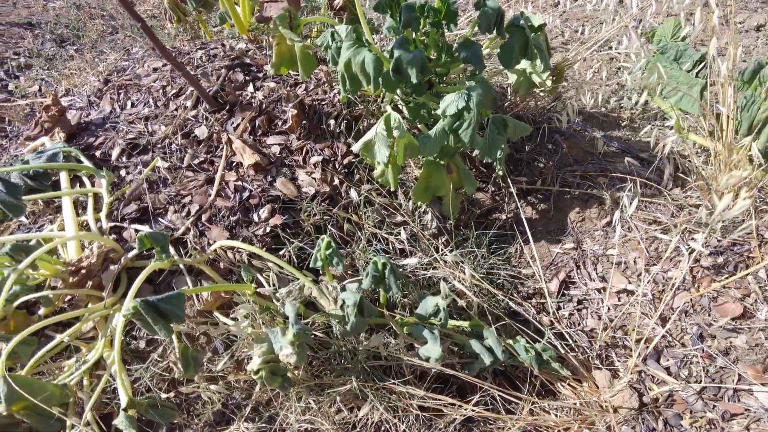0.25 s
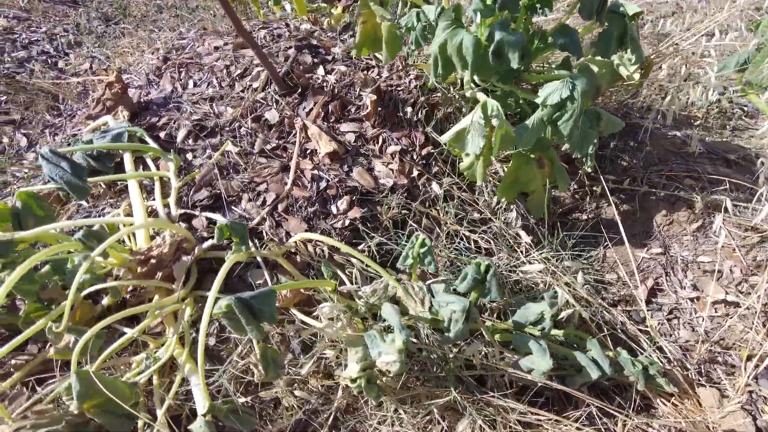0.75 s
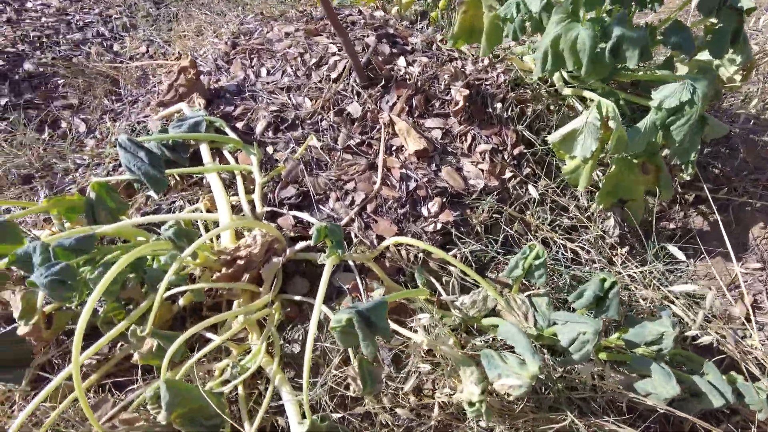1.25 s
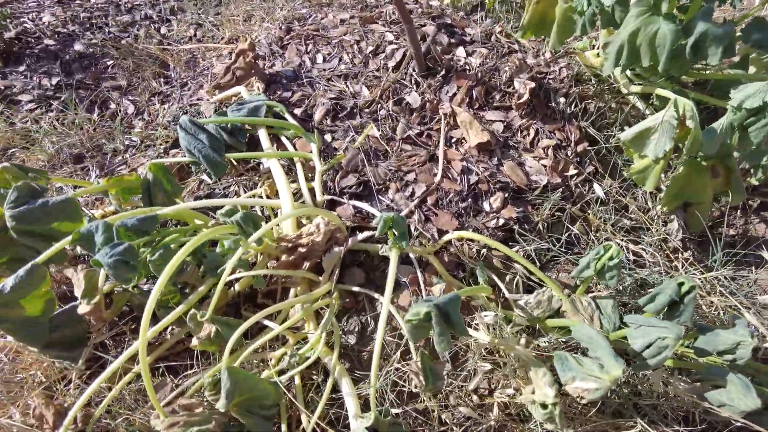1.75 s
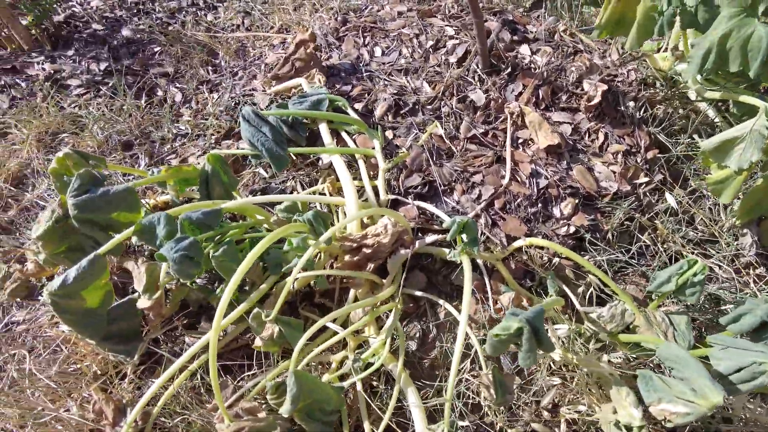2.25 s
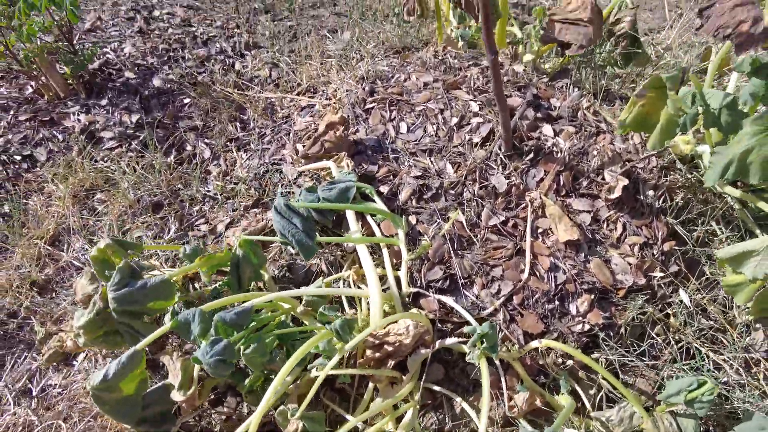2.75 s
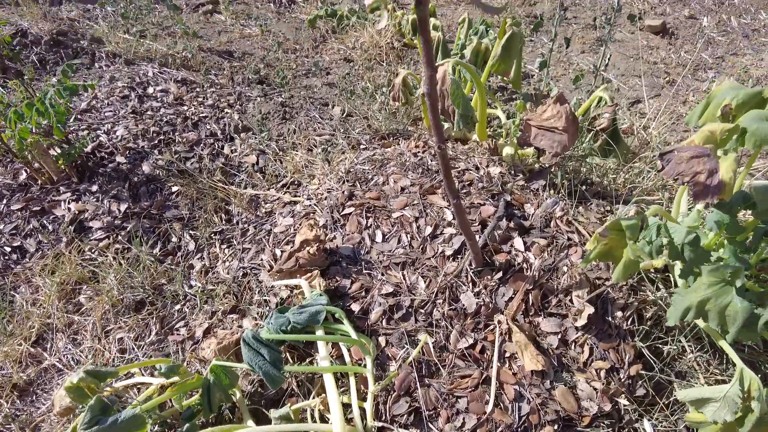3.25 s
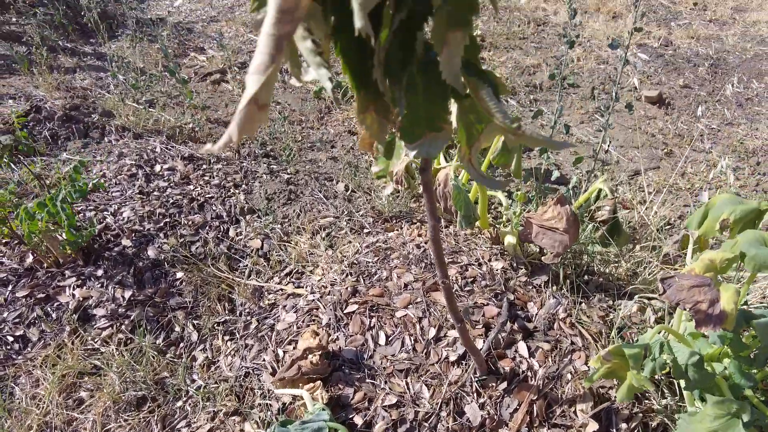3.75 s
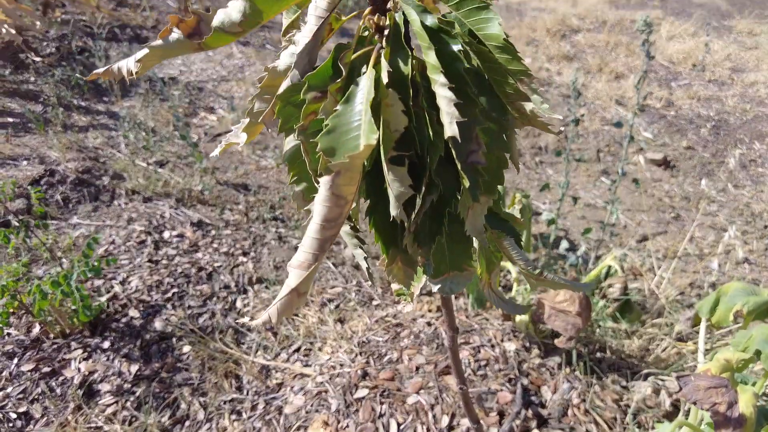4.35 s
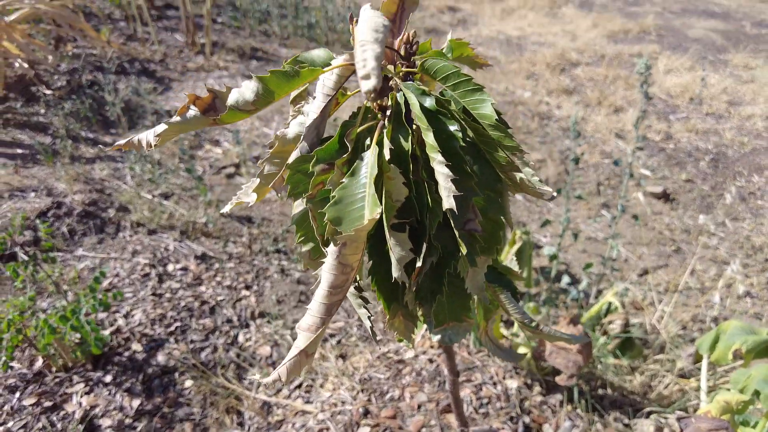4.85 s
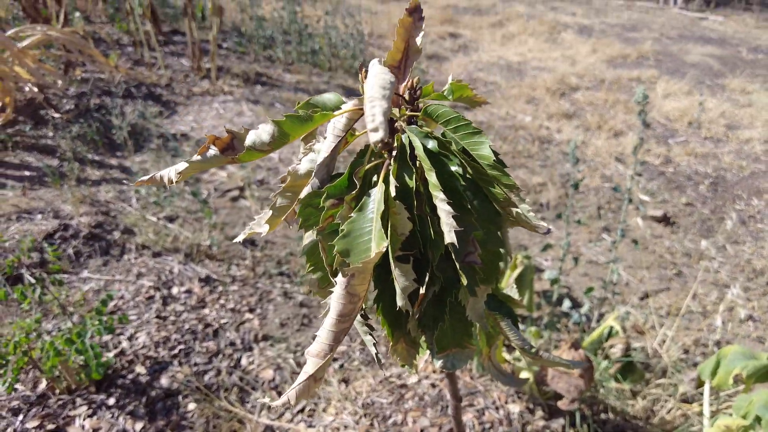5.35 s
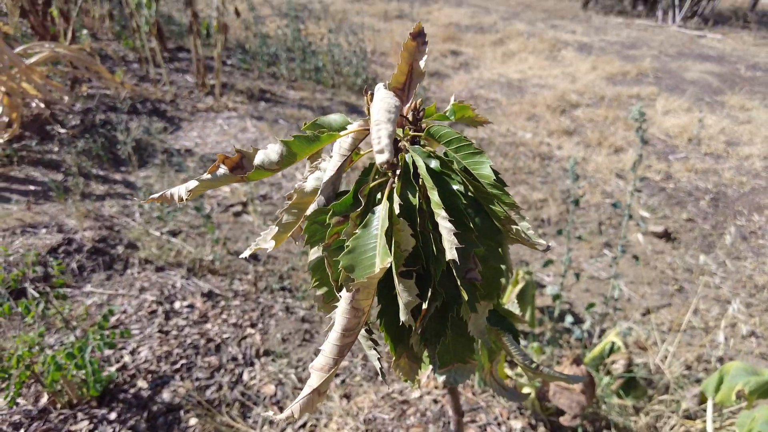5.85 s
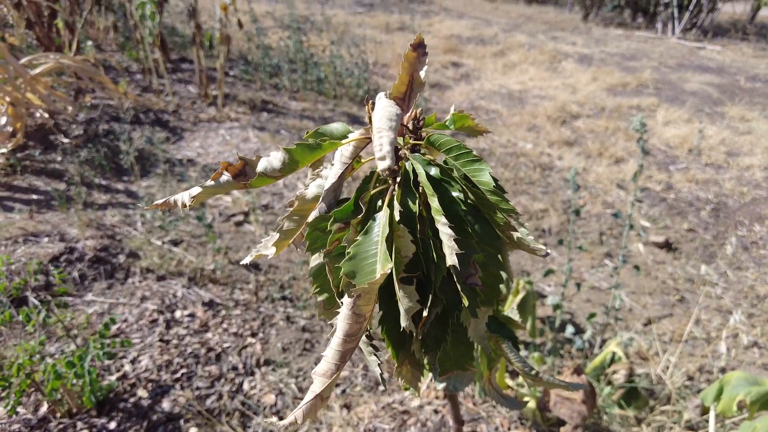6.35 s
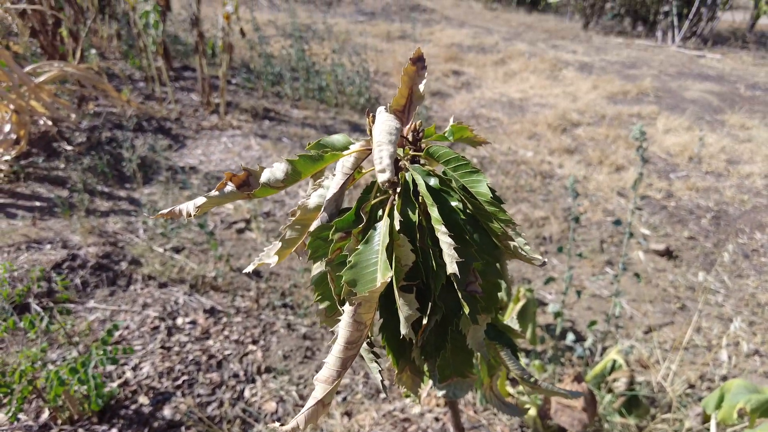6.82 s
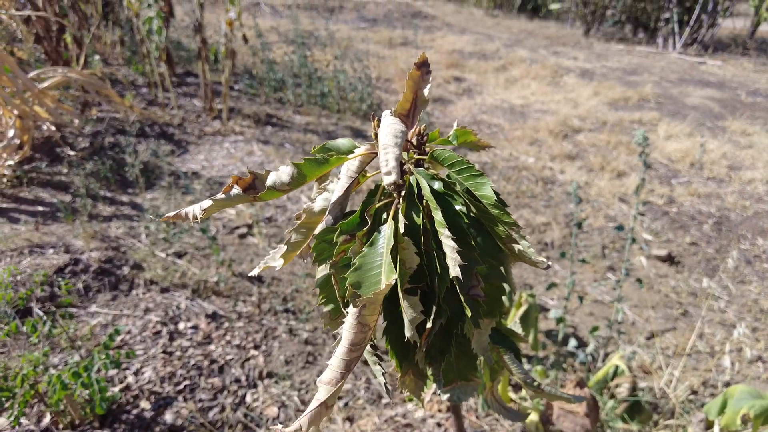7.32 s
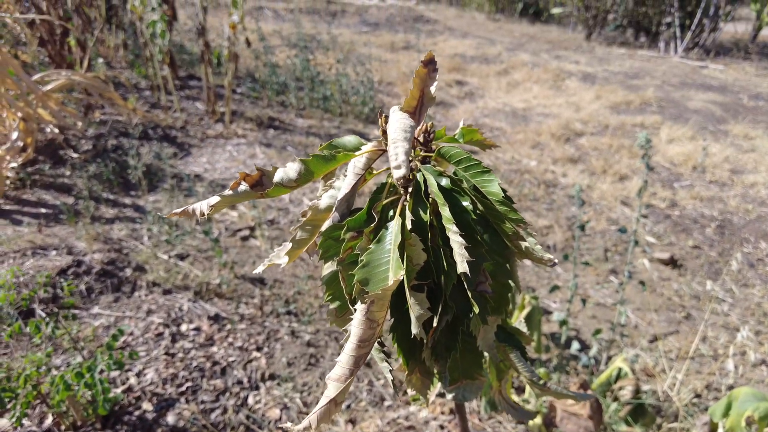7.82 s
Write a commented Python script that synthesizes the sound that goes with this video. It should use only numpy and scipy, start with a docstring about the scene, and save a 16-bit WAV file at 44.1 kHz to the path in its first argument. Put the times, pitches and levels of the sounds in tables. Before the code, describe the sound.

A foot presses into dry leaves and mulch close to the microphone, crunching and snapping small stalks for about a second and a half. It then settles, leaving softer, scattered crackles and a few sharper snaps near the end. Far off in the dry garden, cicadas drone steadily and a nearer insect rasps faintly in phrases. Light wind rumbles on the microphone throughout.

```python
"""Dry leaves and mulch crackle close under the microphone as a foot shifts, then settles.
Stalks snap and ring under its weight, countless small leaves break, and the sole drags twice.
Far off a cicada chorus drones over faint air; a nearer insect rasps in phrases.
The microphone is a small two-port one, and wind rumbles on its ports throughout."""
import sys
import numpy as np
from scipy import signal
from scipy.fft import rfft, irfft, next_fast_len
from scipy.io import wavfile
from scipy.ndimage import map_coordinates

SR = 44100
rng = np.random.default_rng(int(sys.argv[2]) if len(sys.argv) > 2 else 0)


def master(y):
    """Save y as 16-bit WAV."""
    cut = np.clip(np.atleast_2d(y).T, -1, 1)
    pcm = np.round(cut * 32767)  # scale
    wavfile.write(sys.argv[1], SR, pcm.astype(np.int16))


N = 356504
PADDED = next_fast_len(N)

# Phase between the ports, with a polarity flip at a crossover near 1.2 kHz.
# Each row: frequency in Hz, lead of the left port in radians.
PORT_LEAD = [(200, 0.), (500, 1.5), (950, 3), (1120, 4), (1290, 0), (2000, 0.73), (2700, 0.46), (5000, 3.5),
             (7500, 4.5), (10000, 4.5), (13000, 5), (17000, 12)]
# How alike the ports hear. Each row: frequency in Hz, likeness 0-1 for close litter, then for far sound.
PORT_LIKENESS = [(150, 1, 0.94), (310, 0.98, 0.94), (603, 0.56, 0.24), (2110, 0.98, 0.06),
                 (3380, 0.1, 0.14), (8000, 0.67, 0.41), (16000, 0, 0)]
# Far sound leans left in the treble. Each row: frequency in Hz, left minus right in dB.
FAR_BALANCE = [(200, 0.5), (700, 0.5), (2400, -0.5), (4400, 3), (15000, -1)]
# Colour of the distant air. Each row: frequency in Hz, relative spectral level in dB.
AIR_COLOUR = [(80, -7), (160, -8.5), (330, -12), (700, -19), (2000, -22), (4000, -19.5), (11000, -22.5),
              (14000, -29), (16500, -34)]
# Resonances of the far cicadas. Each row: centre in Hz, width in Hz, relative level in dB.
CICADA_RESONANCES = [(3007, 930, -9.5), (4710, 730, -12), (5570, 840, -0.5), (6254, 790, -1),
                     (6240, 110, -7), (6900, 900, -11), (7760, 850, -9), (8900, 1740, -12.5)]
# Phrases of the nearer insect. Each row: start in seconds, end in seconds, level in dB.
RASP_PHRASES = [(1.295, 2.85, -67), (3.34, 3.412, -65), (3.578, 3.944, -66), (4.064, 4.555, -65.5),
                (4.62, 4.905, -66.5), (6.27, 6.63, -68), (7.084, 7.35, -67.5)]
# Wind on the ports. Each row: time in seconds, rumble level in dB.
WIND_LEVELS = [(0.0, -54), (0.04, -54.5), (0.27, -43.5), (0.31, -59), (0.56, -41), (1.33, -65), (1.44, -58),
               (2.59, -66.5), (2.74, -53), (2.81, -59), (3.19, -55.5), (3.26, -63), (3.49, -51),
               (3.67, -67), (4.43, -54.5), (5.15, -58), (5.83, -48), (6.55, -55), (6.73, -45.5),
               (6.8, -58.5), (6.86, -52), (7.67, -68.5), (7.94, -56.5), (8.08, -57)]
# Drags of the sole. Each row: start and end in seconds, first and last pitch in Hz, width in Hz,
# level in dB.
SOLE_DRAGS = [(0.246, 0.373, 1207, 1420, 262.7, -58), (0.741, 1.13, 1740, 1597, 160.5, -62.5)]
# The litter's four bands: thud, knock, crack, sizzle. Each row: low edge in Hz, high edge in Hz.
LITTER_BANDS = [(170, 1200), (1200, 3500), (3500, 9000), (9000, 16500)]
# How long a snap lingers. One factor on the decay times for each band.
SNAP_LINGER = [2.13, 1.24, 1.96, 1.1]
# Tilt of the crushed leaves. One offset in dB for each band.
CRUSH_OFFSETS_DB = [-2.5, 3.5, 5, 2]
# Litter giving way under the sole. Each row: time in seconds, sizzle level in dB, body level in dB.
CRUSH_LEVELS = [(0.0, -63, -60), (0.17, -47, -51), (0.23, -48.5, -58), (0.36, -40.5, -60.5),
                (0.5, -34.5, -42.5), (0.55, -39, -54.5), (0.6, -50.5, -67), (0.68, -41, -53.5),
                (0.78, -64, -65), (0.85, -53, -63), (1.02, -44.5, -56.5), (1.08, -57, -60),
                (1.32, -66, -68), (1.43, -53, -63.5), (1.6, -74, -76), (1.86, -62, -74), (2.1, -71, -76),
                (2.8, -70, -78), (2.95, -87, -105), (3.35, -64.5, -77.5), (3.54, -76, -87),
                (3.68, -63.5, -73.5), (3.95, -81.5, -87), (4.4, -72.5, -80), (4.74, -73.5, -77.5),
                (4.95, -78.5, -87), (8.08, -87, -93)]
# The loudest single snaps. Each row: start in seconds, knock, crack and sizzle in dB, woody ring in Hz.
STALK_SNAPS = [(0.0558, -45.5, -46, -39, 2480), (0.1096, -37, -54, -52, 3480), (0.132, -50, -39, -33, 2000),
               (0.1377, -34, -37, -25, 2840), (0.144, -46, -51, -34, 324), (0.1518, -49, -32, -30, 1250),
               (0.157, -50, -34, -20, 1030), (0.189, -29.5, -44, -23, 1220), (0.1992, -38, -33, -16, 2900),
               (0.287, -42, -41, -30, 1180), (0.4441, -34, -43, -18.5, 990), (0.464, -43, -33, -16.5, 3730),
               (0.4693, -32.5, -37, -22, 2360), (0.493, -33.5, -36, -30, 1270),
               (0.509, -34, -24, -21, 2300), (0.53, -36, -36, -30, 2180), (0.627, -36, -30, -26, 3220),
               (0.631, -36, -30, -21, 2100), (0.664, -44, -48, -39, 810), (0.6784, -46, -38, -22, 1960),
               (0.6822, -35.5, -34.5, -20, 1700), (0.7154, -34.5, -32.5, -37, 1200),
               (0.7222, -35, -39, -32, 910), (0.7948, -52, -44, -53, 780),
               (0.8095, -27.5, -32.5, -25, 2250), (0.828, -44.5, -47, -34, 900),
               (0.84, -47, -39, -27.5, 3480), (0.856, -47, -38, -29, 850), (0.867, -46, -40, -36, 3470),
               (0.8911, -44, -50, -49, 2610), (0.9652, -33.5, -37, -26, 2130),
               (0.9761, -39.5, -47, -36, 870), (0.9892, -41, -41, -25, 3300), (1.036, -58, -46, -37, 1160),
               (1.058, -58, -38, -29.5, 3220), (1.083, -39, -42, -44, 2660),
               (1.0883, -63, -42, -30.5, 1030), (1.0923, -39.5, -43, -31, 1060),
               (1.1115, -45, -42, -34, 1710), (1.1582, -52, -42, -27, 2950),
               (1.1704, -51.5, -34.5, -28.5, 2960), (1.1921, -37.5, -41, -54, 1790),
               (1.209, -45.5, -64, -52, 1090), (1.2494, -46, -38, -33, 2930),
               (1.2925, -43.5, -42, -41, 2350), (1.3298, -58, -53, -40, 1000),
               (1.3956, -44.5, -49, -34, 3200), (1.4107, -46, -54, -43, 1720),
               (1.4315, -54, -45, -35, 2940), (1.446, -53, -45, -36, 1560),
               (1.4705, -37.5, -42.5, -27.5, 2940), (1.504, -44.5, -62, -67, 800),
               (1.6775, -72, -64, -39.5, 3170), (1.8156, -57, -60, -61, 1390),
               (1.8993, -56, -54, -37.5, 3060), (1.98, -68, -53, -47, 3490),
               (1.997, -47.5, -43.5, -45, 980), (2.1626, -39.5, -32.5, -34, 2480),
               (2.203, -61, -51, -41.5, 2720), (2.2887, -66, -43.5, -51, 3600),
               (2.3062, -59, -46, -47, 2960), (2.4156, -58, -56, -62, 900),
               (2.4936, -46.5, -47, -38.5, 2670), (2.5527, -51, -68, -68, 1050),
               (2.801, -79, -65, -50.5, 2710), (3.041, -79, -65, -49, 3170), (3.106, -66, -59, -52, 880),
               (3.22, -76, -64, -52, 3400), (3.334, -74, -63, -40, 3600), (3.365, -67, -48, -42, 2950),
               (3.3696, -55, -54, -40, 3000), (3.382, -60, -50, -42, 3100), (3.4253, -71, -56, -49, 3190),
               (3.5796, -58, -43, -43, 3400), (3.659, -60, -49, -45, 3080), (3.704, -53, -49, -34.5, 3520),
               (3.7507, -54, -45, -36, 1670), (3.7593, -47, -44.5, -45, 2920), (3.86, -54, -48, -42, 3320),
               (4.092, -43, -42.5, -39.5, 2890), (4.1733, -67, -56, -47, 3600),
               (4.4163, -55, -47.5, -40.5, 2000), (4.499, -63, -48, -39, 2990),
               (4.593, -77, -51, -42, 2510), (4.656, -47.5, -50, -51, 3110), (4.699, -58.5, -62, -66, 1300),
               (4.7467, -62, -66, -60, 2820), (4.816, -55.5, -52, -52, 2870),
               (4.8814, -60, -49.5, -43, 3400), (5.314, -80, -62, -53, 2780),
               (5.858, -62.5, -58, -52, 2390), (5.926, -65, -68, -70, 800), (6.029, -83, -66, -58, 2820),
               (6.1504, -74, -53, -51, 3380), (6.2773, -65.5, -51, -61, 3600),
               (6.3946, -47, -42.5, -53, 3240), (6.4479, -43, -44, -43, 2800), (6.545, -60, -58, -71, 1920),
               (6.826, -61, -53, -54, 2940), (6.9057, -73, -45.5, -37, 3200),
               (7.0937, -50.5, -36.5, -32.5, 2040), (7.3895, -79, -62, -53, 3080)]
# Colour of the litter at the microphone. Each row: frequency in Hz, gain in dB, left minus right in dB.
LITTER_COLOUR = [(169, -1, 5), (290, -2.5, -1.5), (350, -7, 2), (566, 1, 0.5), (1170, 1, 2),
                 (2220, -0.5, 1.5), (3400, -1, 0), (6270, -1, 2.5), (8100, -3.5, 4), (11500, -4, 2),
                 (14600, 0, 8.5), (16800, -2, 3)]


def undb(db):
    return 10 ** (np.asarray(db) / 20)


def unit(x):
    """Scale to rms 1."""
    return x / np.sqrt(np.mean(x ** 2))


def curve(rows):
    """Columns of a (seconds, value, ..) table at every sample."""
    times, *columns = np.transpose(rows)
    return [np.interp(np.arange(N) / SR, times, c) for c in columns]


def on_bins(rows):
    """Columns of a (Hz, value, ..) table at every spectral bin."""
    hz, *columns = np.transpose(rows)
    log_hz = np.log(np.arange(PADDED // 2 + 1) * SR / PADDED + 1)
    return [np.interp(log_hz, np.log(hz), c) for c in columns]


def band(x, lo_hz, hi_hz):
    """Band-pass with gain 1 in the band."""
    return signal.sosfilt(signal.butter(2, [lo_hz, hi_hz], "bandpass", fs=SR, output="sos"), x)


def wander(per_s):
    """Random levels joined by straight lines, per_s new ones a second; spread near 1."""
    levels = rng.standard_normal(4000)
    return 1.2 * map_coordinates(levels, [np.arange(N) * per_s / SR], order=1)


def resonance(hz, width_hz):
    """A pair of unrelated noises rung twice through one resonance, rms 1."""
    edges = hz - .6 * width_hz, hz + .6 * width_hz
    return unit(band(band(rng.standard_normal((2, N)), *edges), *edges))


def ports(pair, likeness, colour_db, pan_db):
    """The left port hears the first sound; the right a blend with its twin, shifted in phase."""
    first, twin = rfft(pair, PADDED) * undb(colour_db)
    blend = likeness * first + np.sqrt(1 - likeness ** 2) * twin
    right = blend * np.exp(-1j * on_bins(PORT_LEAD)[0])
    return irfft([first * undb(pan_db / 2), right * undb(-pan_db / 2)], PADDED)[:, :N]


def distant_air(level_db=-73.5):
    """A faint steady hiss behind everything, heavier in the bass."""
    hz = np.arange(PADDED // 2 + 1) * SR / PADDED
    colour = undb(on_bins(AIR_COLOUR)[0]) * (hz > 60)
    hiss = irfft(rfft(rng.standard_normal((2, PADDED))) * colour, PADDED)[:, :N]
    return unit(hiss) * undb(level_db)


def far_cicadas(level_db=-60):
    """So many far singers that their clicks fuse to a hiss."""
    chorus = sum(undb(db + wander(per_s=11)) * resonance(hz, width_hz)
                 for hz, width_hz, db in CICADA_RESONANCES)
    return unit(chorus) * undb(level_db)


def nearer_insect(edge_s=0.023):
    """One insect, closer in, rasps through a single resonance and pauses between phrases."""
    t = np.arange(N) / SR
    phrases = sum(undb(db) * np.clip(np.minimum(t - start, end - t) / edge_s + .5, 0, 1)
                  for start, end, db in RASP_PHRASES)
    flicker = undb(1.2 * wander(per_s=30))
    return phrases * flicker * resonance(hz=3093, width_hz=990)


def wind_on_microphone(gust_db=2.5, flutter_db=-14.5):
    """Slow eddies push both ports nearly alike; their energy falls steeply with pitch."""
    level_db = curve(WIND_LEVELS)[0] + gust_db * wander(per_s=9)
    eddies = band(band(rng.standard_normal(N), 12.6, 46.9), 16.2, 46.8)
    rumble = unit(eddies) * undb(level_db)
    flutter = unit(band(rng.standard_normal((2, N)), 49.2, 87.8)) * undb(level_db + flutter_db)
    opposed = undb(-20) * flutter[1] * np.array([[1], [-1]])
    return rumble + flutter[0] + opposed


def dragging_sole(edge_s=0.029):
    """The sole drags and a hollow stalk hums: a rough, narrow, sliding tone."""
    t, hum = np.arange(N) / SR, 0
    for start, end, first_hz, last_hz, width_hz, db in SOLE_DRAGS:
        phase = 2 * np.pi * np.cumsum(np.interp(t, [start, end], [first_hz, last_hz])) / SR
        gate = np.clip(np.minimum(t - start, end - t) / edge_s, 0, 1)
        rough_tone = wander(width_hz) * np.cos(phase) + wander(width_hz) * np.sin(phase)
        hum = hum + undb(db) * gate * rough_tone
    return hum


def crushed_leaves(most_per_s=4200, fewest_per_s=450, t60_s=0.043):
    """Band envelopes of small leaves breaking at random; a few are much louder, each has its colour."""
    spread_db, colour_db, patchy_db = 3, 3, 2
    sizzle_db, body_db = curve(CRUSH_LEVELS)
    load = undb(0.5 * (sizzle_db - sizzle_db.max()))  # a lighter load breaks fewer leaves
    chance = np.maximum(most_per_s * load, fewest_per_s) / SR
    breaks = rng.random(N) < chance
    size_db = spread_db * rng.exponential(size=N)
    decay_samples = t60_s * SR / np.log(1000)
    overlap = chance * decay_samples
    envelopes = []
    for sizzle_share, offset_db in zip([0, 0, 0.5, 1], CRUSH_OFFSETS_DB):
        size = undb(size_db + colour_db * rng.standard_normal(N))
        patter = signal.lfilter([1], [1, -np.exp(-1 / decay_samples)], breaks * size)
        expected_rms = np.sqrt((overlap * size.mean()) ** 2 + overlap * np.mean(size ** 2) / 2)
        level_db = sizzle_share * sizzle_db + (1 - sizzle_share) * body_db + offset_db
        envelopes.append(patter / expected_rms * undb(level_db))
    patches = undb(patchy_db * wander(per_s=8.1))  # the litter gives way unevenly
    return np.array(envelopes) * patches


def snapping_stalks(rise_s=0.00063, ring_t60_s=0.024):
    """Band envelopes of the snaps, each a spike then a weaker tail, and each broken stalk's ring."""
    spike_t60_s, tail_t60_s = np.outer([0.0044, 0.018], SNAP_LINGER)[:, :, None]  # one for each band
    t = np.arange(1500) / SR
    rise = 1 - np.exp(-(t / rise_s) ** 2)
    fall = 1.3 * undb(-60 * t / spike_t60_s) + undb(-5.5 - 60 * t / tail_t60_s)
    envelopes, rings = np.zeros((len(LITTER_BANDS), N + len(t))), np.zeros(N + len(t))
    for start, knock_db, crack_db, sizzle_db, ring_hz in STALK_SNAPS:
        at = slice(int(start * SR), int(start * SR) + len(t))
        thud_db = knock_db - 5.5 - 9.5 * np.log2(ring_hz / 1240)  # thick stalks ring lower, thud more
        envelopes[:, at] += undb([thud_db, knock_db, crack_db, sizzle_db])[:, None] * rise * fall
        ring = undb(-60 * t / ring_t60_s) * np.sin(2 * np.pi * (ring_hz * t + rng.random()))
        rings[at] += undb(knock_db - 1.5) * rise * ring
    return envelopes[:, :N], rings[:N]


def foot_on_litter():
    """Snaps and crushed leaves shake noise through the litter's bands, over the stalks' ring and hum."""
    snap_envelopes, rings = snapping_stalks()
    pair = rings + dragging_sole()
    shakes = np.hypot(snap_envelopes, crushed_leaves())  # their powers add
    for shake, (lo_hz, hi_hz) in zip(shakes, LITTER_BANDS):
        noise = rng.standard_normal((2, N)) * np.sqrt(SR / 2 / (hi_hz - lo_hz))
        pair = pair + band(shake * noise, lo_hz, hi_hz)
    return pair


def scene():
    """The foot close under the microphone, insects and air beyond it, wind right on the ports."""
    close_likeness, far_likeness = on_bins(PORT_LIKENESS)
    close = ports(foot_on_litter(), close_likeness, *on_bins(LITTER_COLOUR))
    background = far_cicadas() + nearer_insect() + distant_air()
    far = ports(background, far_likeness, colour_db=0, pan_db=on_bins(FAR_BALANCE)[0])
    return close + far + wind_on_microphone()


def record(dry, shelf_hz=15800, shelf_db=-26, top_hz=16800):
    """The top octave ends in a step down, then a steep cut."""
    below = signal.sosfiltfilt(signal.ellip(8, .1, 60, shelf_hz, fs=SR, output="sos"), dry)
    stepped = below + undb(shelf_db) * (dry - below)
    return signal.sosfilt(signal.ellip(10, .2, 80, top_hz, fs=SR, output="sos"), stepped)


dry = scene()
out = record(dry)
master(out)
```